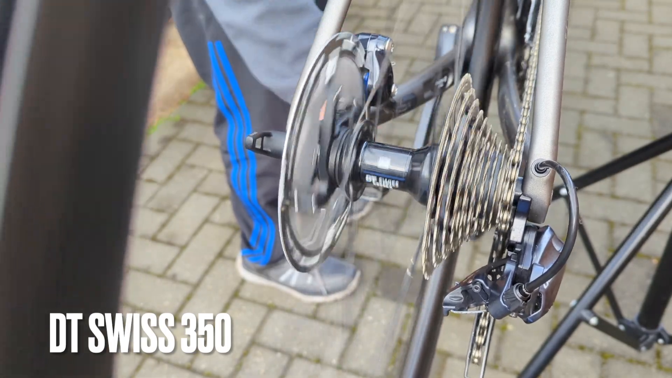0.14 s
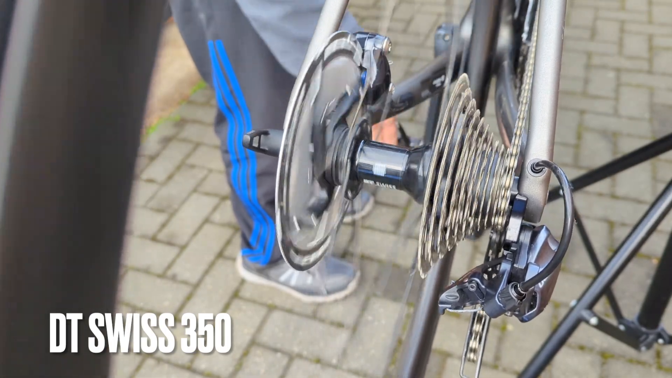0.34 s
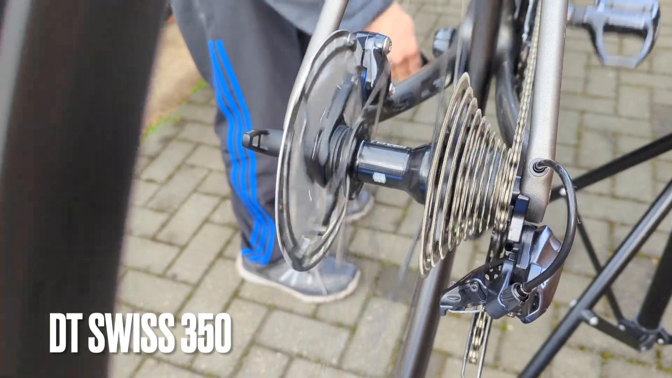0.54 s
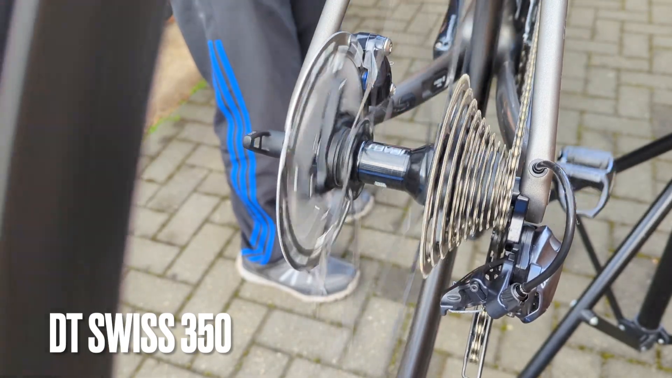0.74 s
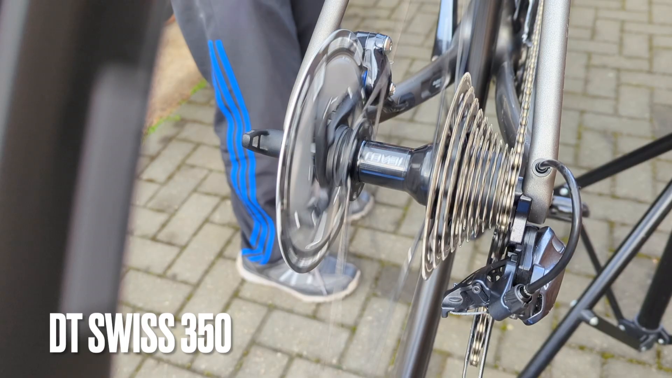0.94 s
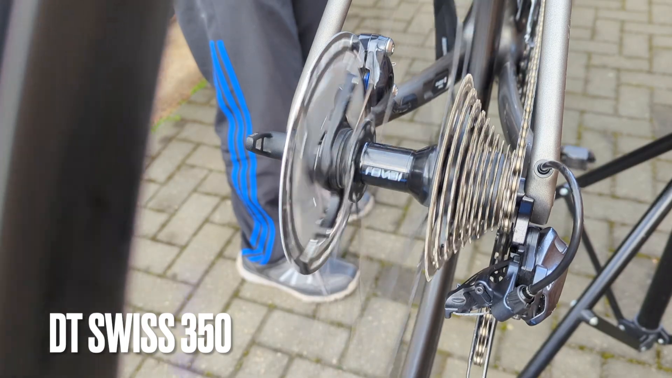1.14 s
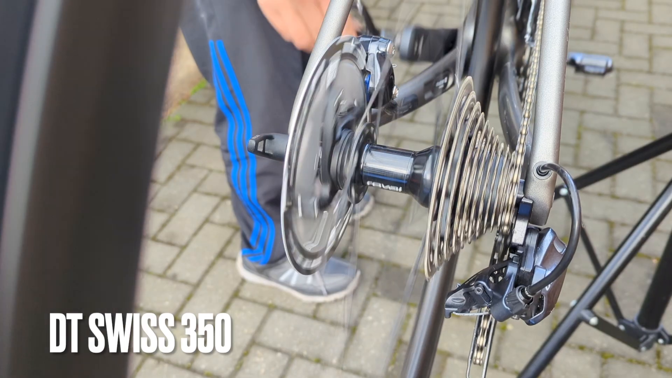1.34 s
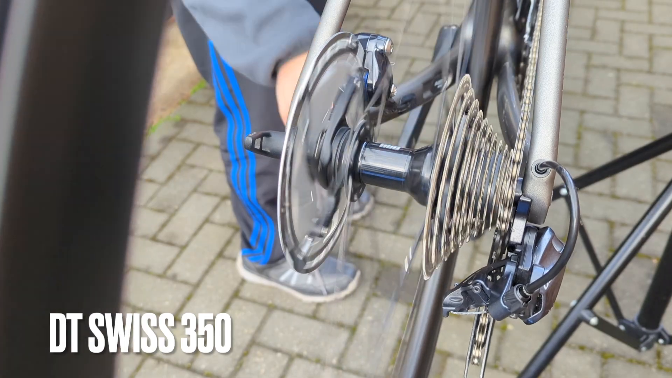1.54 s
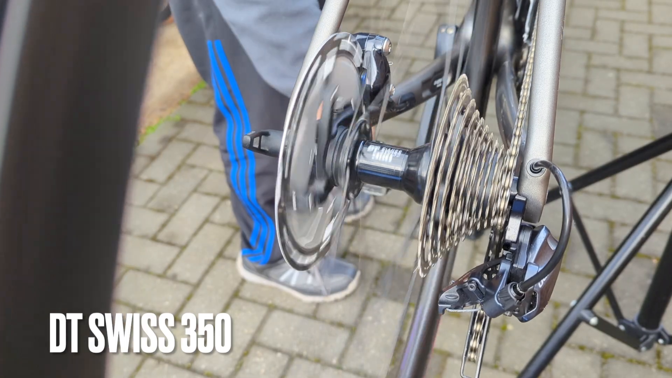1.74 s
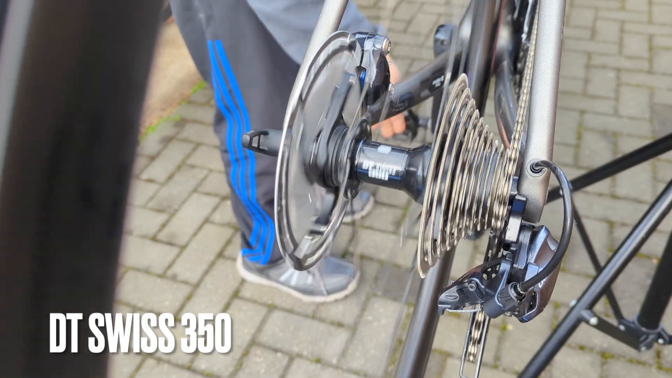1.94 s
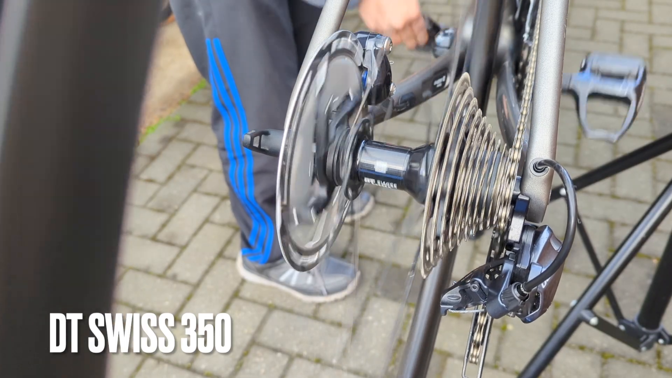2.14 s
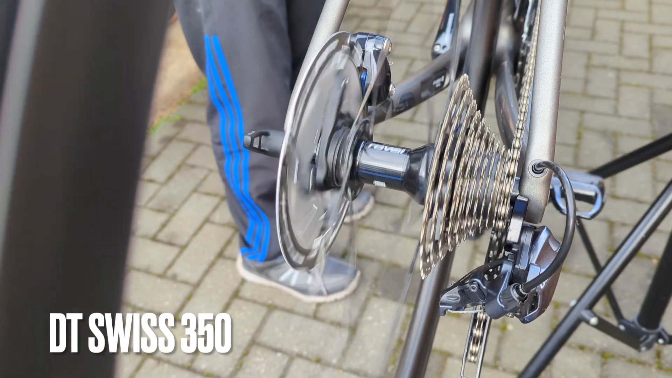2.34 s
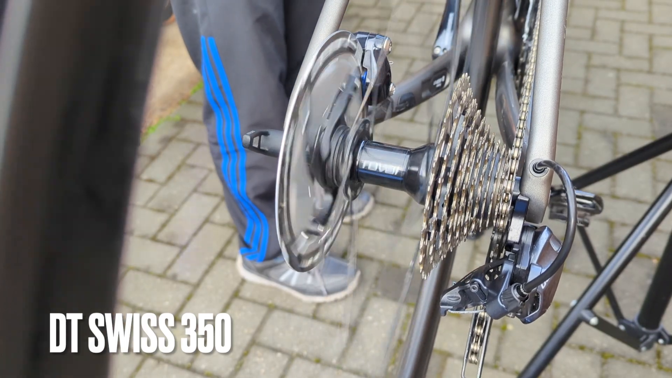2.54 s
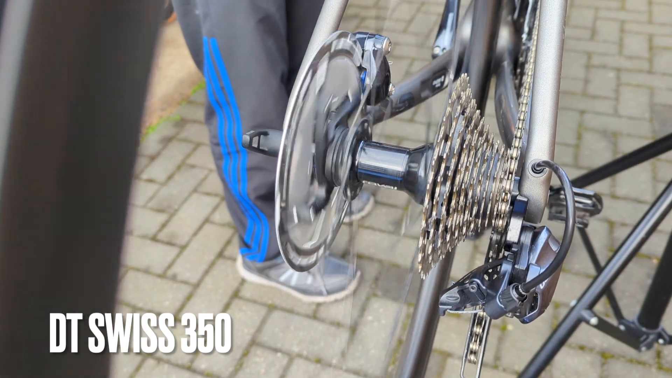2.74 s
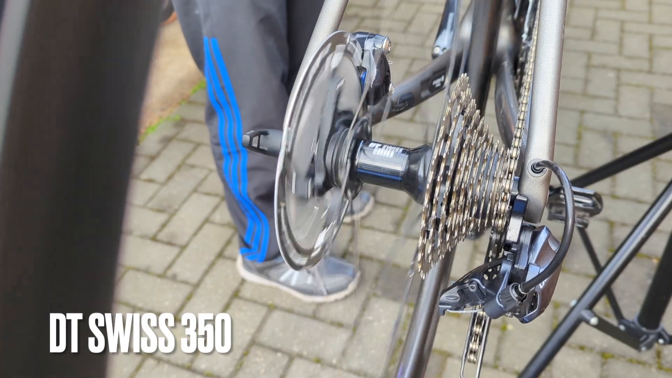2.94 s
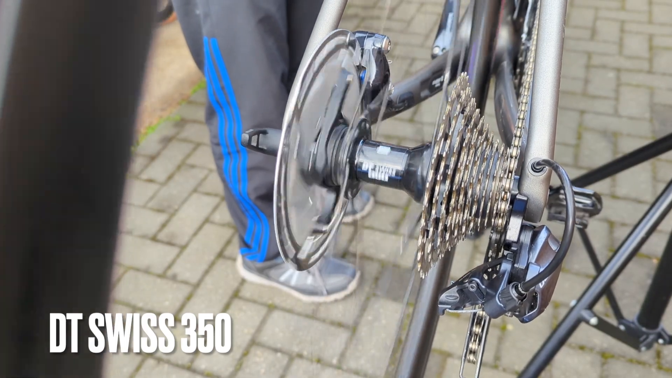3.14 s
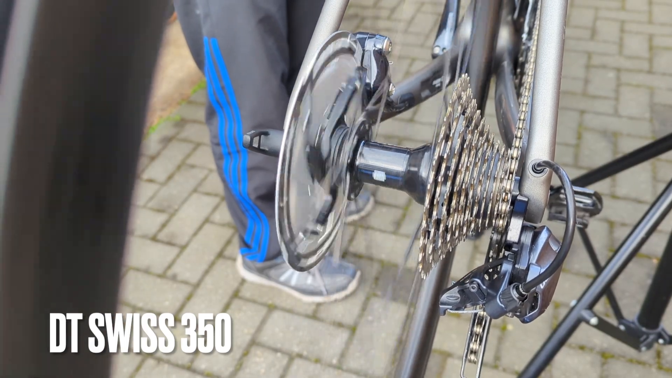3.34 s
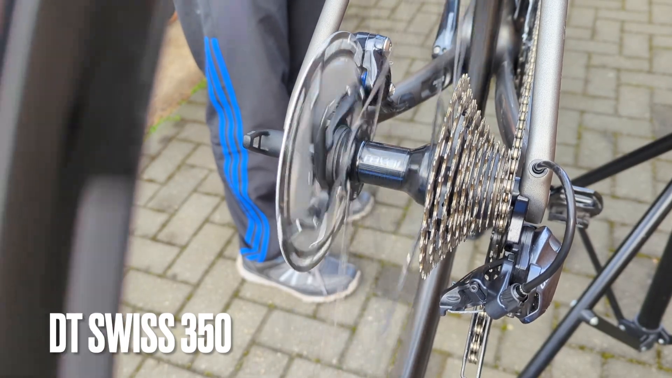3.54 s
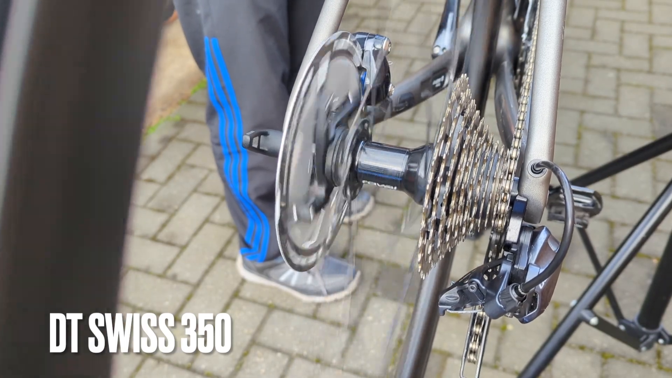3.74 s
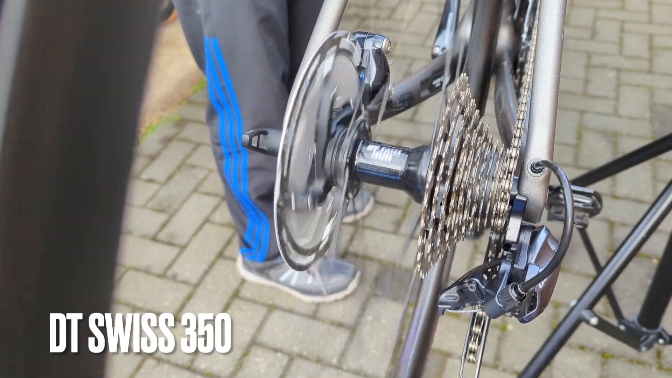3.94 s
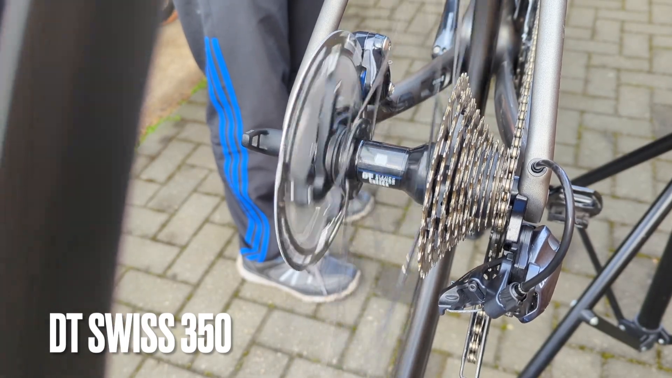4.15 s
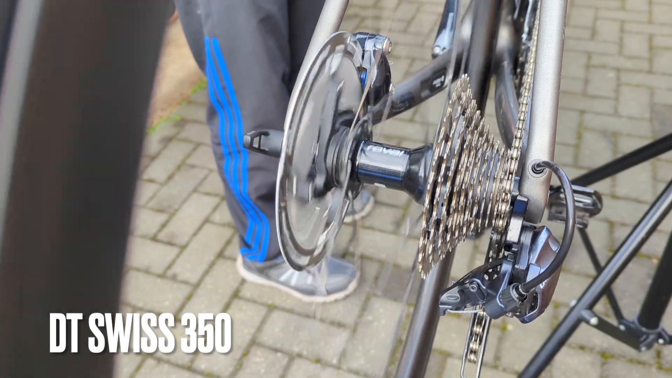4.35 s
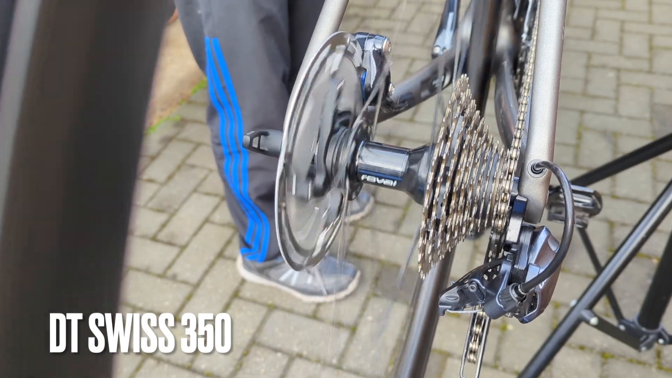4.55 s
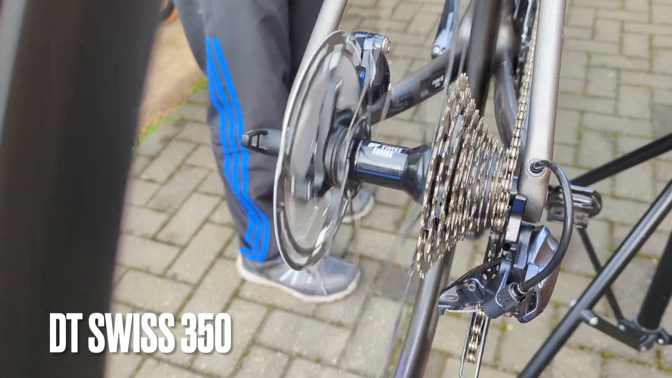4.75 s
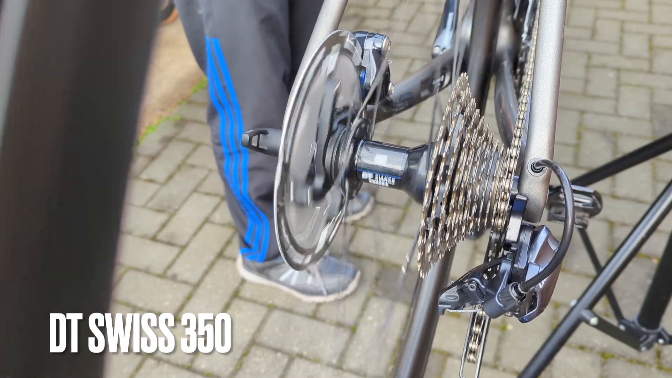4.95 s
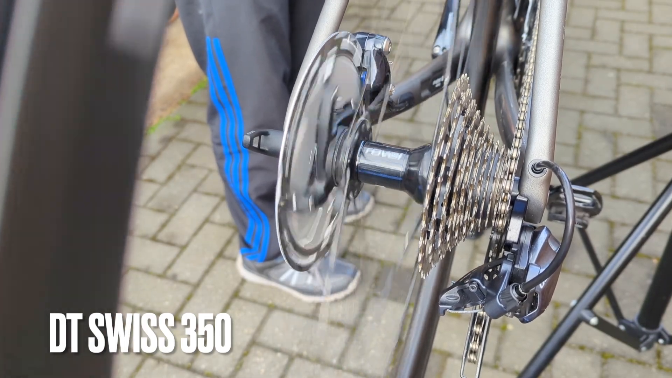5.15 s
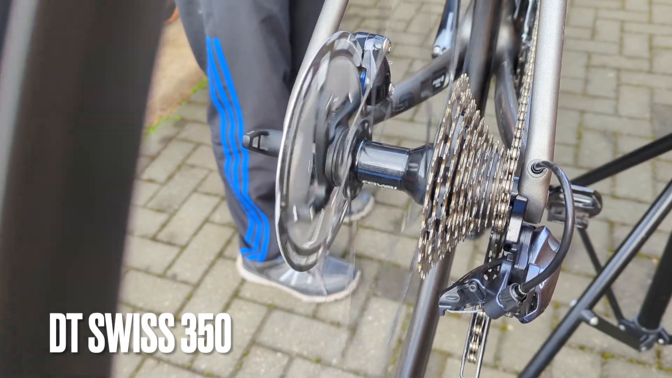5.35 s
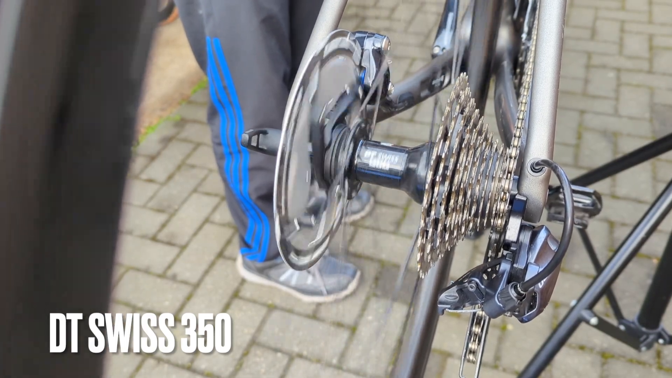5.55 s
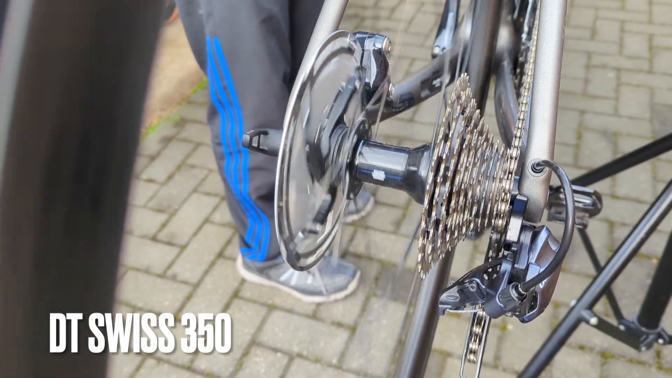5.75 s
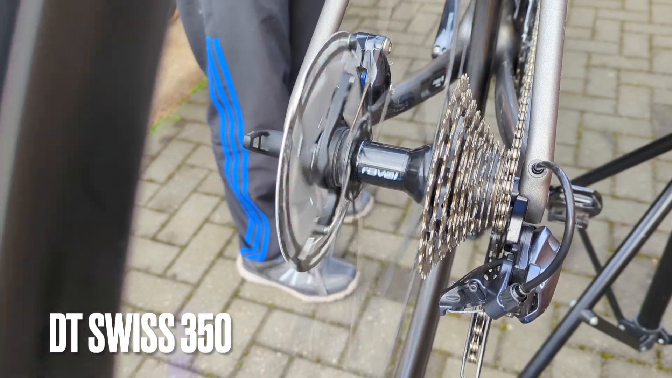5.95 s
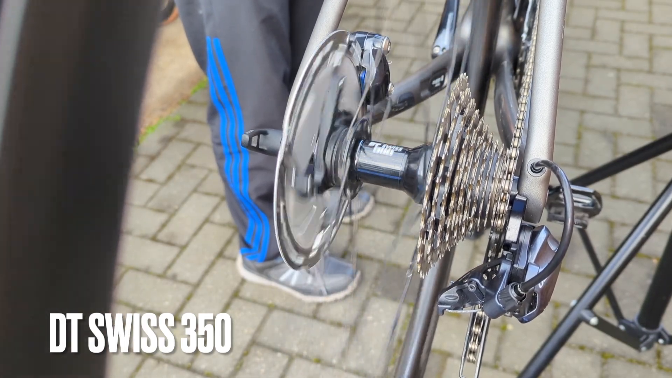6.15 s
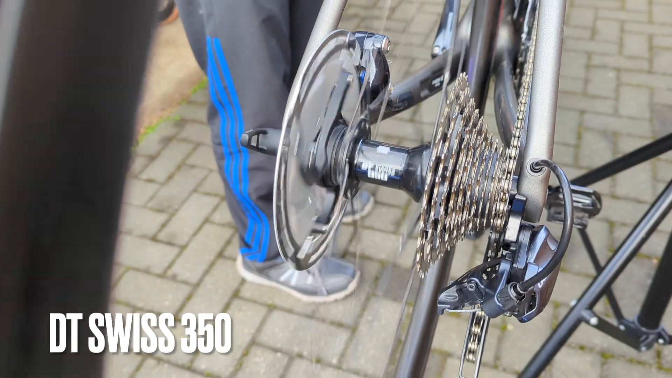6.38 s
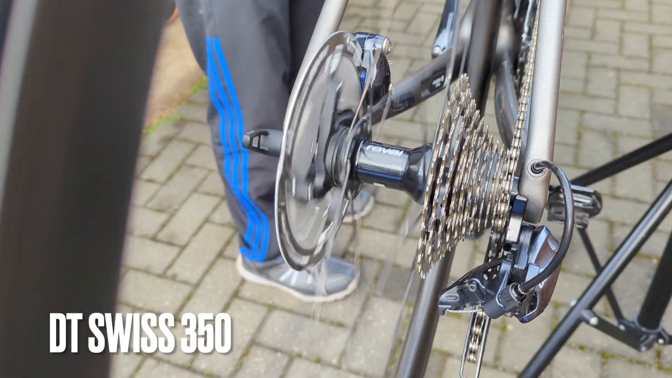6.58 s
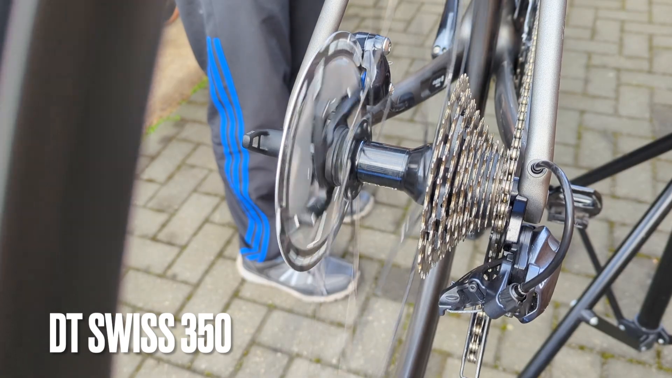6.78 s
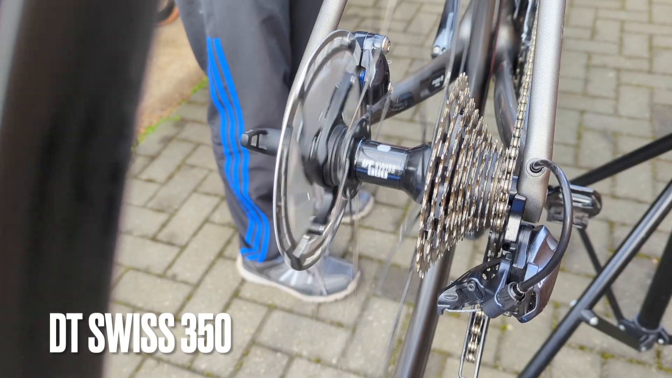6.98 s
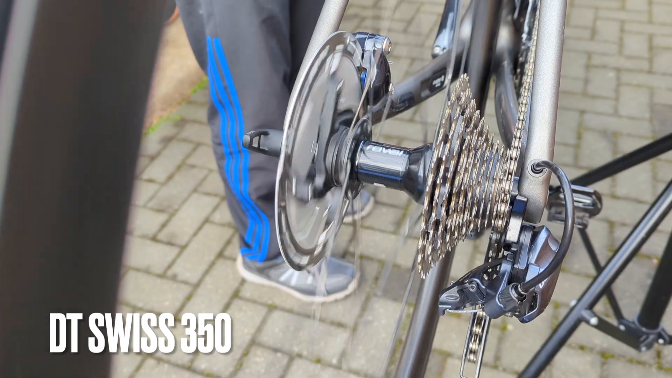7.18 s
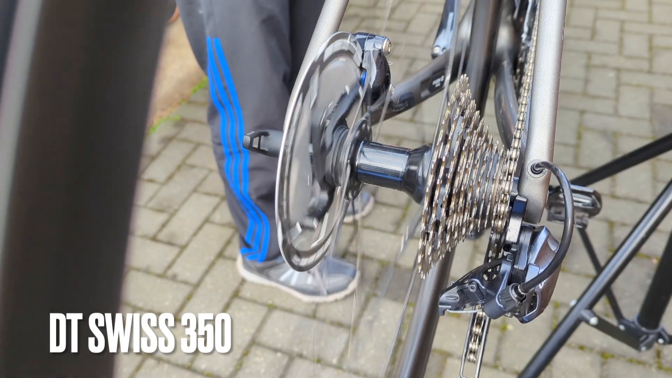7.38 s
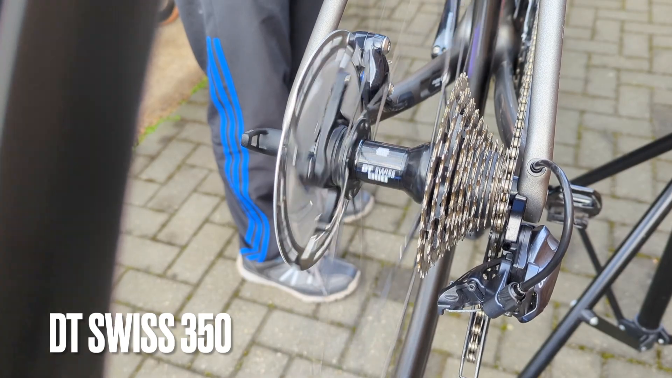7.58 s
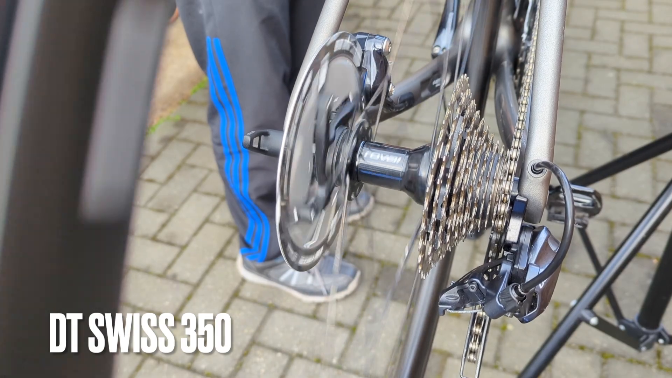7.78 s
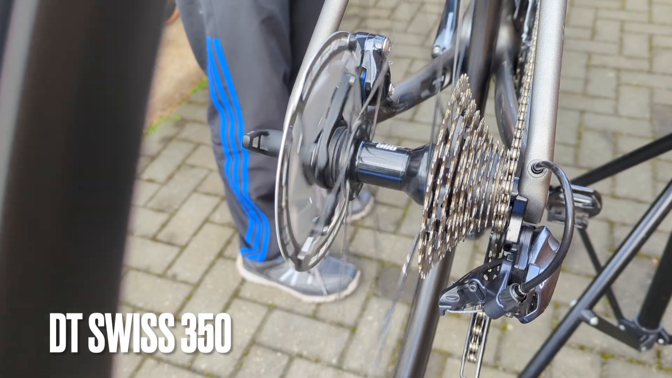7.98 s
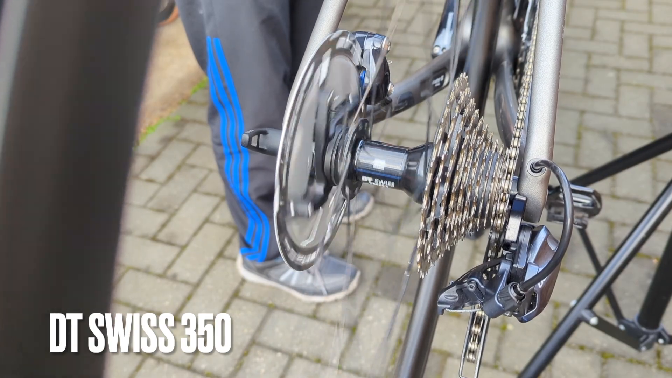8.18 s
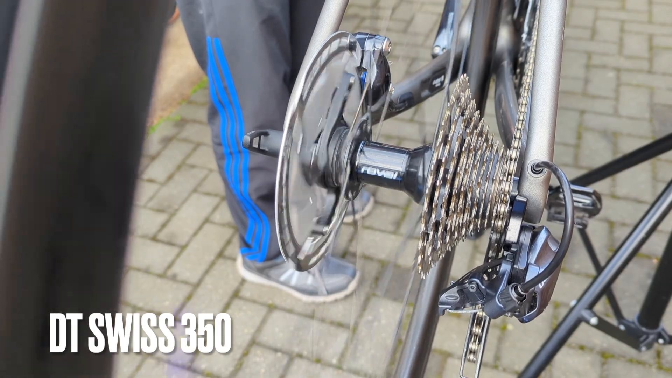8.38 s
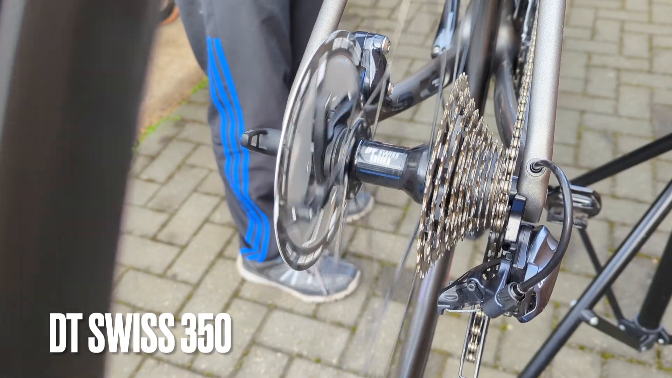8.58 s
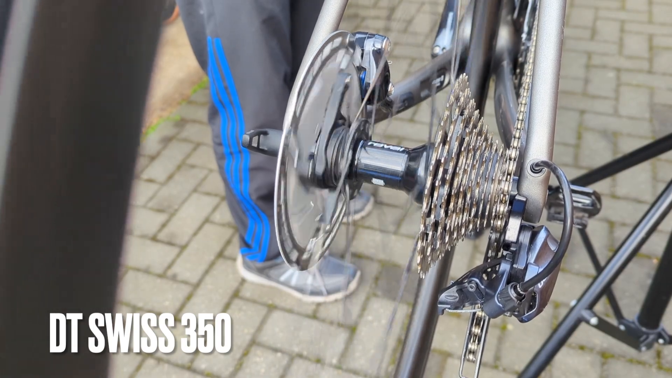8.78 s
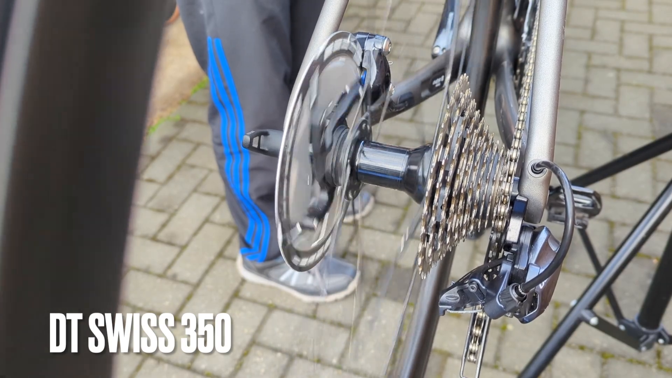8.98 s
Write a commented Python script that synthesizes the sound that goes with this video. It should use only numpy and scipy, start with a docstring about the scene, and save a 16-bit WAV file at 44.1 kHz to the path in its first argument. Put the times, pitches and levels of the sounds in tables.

```python
"""Freewheeling bicycle wheel

A bicycle rear wheel spins on a stand outdoors, close to two microphones. Pawls (small sprung catches) snap over
a ring of 60 teeth: fast and wavering while the cranks turn backwards, then slowly falling as the wheel coasts.
Clicks timed by the teeth are shaped into blow, clatter and snap, and ring the metal; uneven teeth repeat every
turn. Shaped noise makes gusts, mostly on the left, and a distant street; fading tones make soft knocks nearby.
"""
import sys
import numpy as np
from scipy import signal
from scipy.fft import rfft, irfft, next_fast_len
from scipy.io import wavfile
from scipy.ndimage import uniform_filter1d

SR = 44100
rng = np.random.default_rng(int(sys.argv[2]) if len(sys.argv) > 2 else 0)


def digitize_waveform(pressure):
    """Quantize a signal to 16-bit integers and store it at the path in sys.argv[1].

    Rows of a 2-D input are taken as channels; values are limited to [-1, 1].
    """
    field = np.atleast_2d(pressure).T
    bounded = np.clip(field, -1, 1)
    quanta = np.round(bounded * 32767).astype(np.int16)
    wavfile.write(sys.argv[1], SR, quanta)


def magnitude_from_level(level_db):
    """Linear magnitude for a level in decibels (20 dB per decade)."""
    exponent = np.asarray(level_db, float) / 20
    return 10 ** exponent


N = 397782  # length in samples

TEETH = 60
# Speed past the pawls, as back-pedalling adds to wheel speed: t/s, speed/(teeth per s)
PEDALLING = [(0.0, 448.0), (0.08, 431.0), (0.2, 420.0), (0.36, 441.0), (0.56, 482.0), (0.67, 480.3),
             (1.1, 431.2), (1.29, 442.3), (1.36, 474.9), (1.55, 427.4), (1.68, 404.0), (1.79, 417.0),
             (1.96, 450.2), (2.04, 454.2), (2.12, 438.9), (2.23, 441.2), (2.29, 411.4), (2.46, 262.0)]
# The free wheel slows by drag in proportion to its speed; DRAG_S is the time to fall to 37 %
COAST_S, COAST_TEETH_PER_S, DRAG_S = 2.5, 249.22, 19.984
UNBALANCE, FASTEST_TOOTH = 0.0085, 57  # speed swing once a turn (share), tooth where it peaks
# Unevenness round the ring, as waves: count/(waves per turn), depth/dB, first crest/tooth
BLOW_WAVES = [(1, 1.7, 4.7), (4, .5, 2.4), (6, .45, 2.4)]
CLATTER_WAVES = [(1, 1.1, 59.9), (2, 1.2, 6.5), (4, .7, .2), (5, .45, 1.6)]
SNAP_WAVES = [(1, 1.1, 58.1), (2, 1.3, 8.7), (3, .9, 13.2), (4, .7, .2), (5, 1.4, 11.2), (6, 1.2, 7.7),
              (10, .9, 4.8)]
SNAP_DB_PER_OCTAVE = 2.5  # the bright snap grows with each doubling of tooth speed
# The pawls land neatly, bounce above a certain speed, and rattle loosely as the cranks stop
SCATTER_S, BOUNCE_TEETH_PER_S, BOUNCE_S_PER_OCTAVE = 0.00001, 440.0, 0.00022
STOP_S, STOP_LENGTH_S, STOP_SCATTER_S = 2.38, 0.17, 0.00026
PATCH_S, PATCHY_DB = 0.06, 3.5  # neat and loose spells alternate
PLAY_TEETH, PLAY_S = 0.012, 0.012  # play in the ring lets the blows drift early and late
# Tone colour of the regular blow into hub and spokes: f/Hz, relative level/dB
BLOW_COLOUR = [(150, -74), (300, -39), (450, -25.5), (600, -15.5), (800, -23), (1100, -21.5), (1300, -10.5),
               (1500, -21), (1900, -11), (2300, -3.5), (3200, -3.5), (4300, -5.5), (5200, -12), (6500, 0),
               (8000, -35)]
# Tone colour of the scattered clatter: f/Hz, relative level/dB
CLATTER_COLOUR = [(3500, -40), (4700, -10.5), (5500, -6.5), (6200, -5.5), (8000, -6.5), (10500, -6),
                  (11500, -14.5), (13000, -60)]
# Tone colour of the bright snap: f/Hz, relative level/dB
SNAP_COLOUR = [(9000, -42.5), (11300, -7.5), (11900, 4.5), (12350, 7.5), (13000, 4.5), (13800, 4),
               (14600, -1.5), (15500, 3), (16200, -70), (17000, -95)]
BLOW_DB, CLATTER_DB, SNAP_DB = -29.5, -23.5, -17  # before force and left-right lean
SPOKE_PATHS = 12
LEAD_S = 0.0002  # the hub is nearer the left microphone
# Ringing of the turning metal parts: f/Hz, width/Hz, level/dB before beam, force and lean, lobes/(per turn),
# lobe depth/(0-1), loudest left/tooth, loudest right/tooth, left lead/rad
MODES = [(586, 34, -65.5, 1, 0.2, -6, 0, 1.17), (693.7, 27, -59, 1, .2, -1, 15, 1.07),
         (843, 68, -63, 2, 0.83, 17, -13, 0.5), (1285, 550, -52.5, 1, 0.15, -7, 29.5, 2.2),
         (1608, 80, -49.5, 2, 0.2, 9, -18, 0.29), (1908, 193, -40.5, 2, 0.18, 9.5, 12, 1.3),
         (2154, 168, -40.5, 2, 0.45, -4, 9.5, 0.97), (2500, 205, -38, 3, 0.16, 9, 1, 3.55),
         (2904.5, 116, -33.5, 2, 0.07, 14.5, 7, 0.84), (3138, 32, -44, 3, 0.9, -3.5, 16, 2.4),
         (3450, 90, -45.5, 3, 1, 50.5, -4.5, 4.9), (3858, 470, -35, 2, 0, -16, -26, 2),
         (4562, 150, -40.5, 3, 0.2, 2, 8, 4.4), (5022, 44, -33.5, 4, 0.02, -25, 0, 4.08),
         (5700, 61, -40, 4, 0.7, -16, 1, 7.8), (5860, 47, -34, 4, 1, 19.5, 1.5, 4.35),
         (5970, 13, -41.5, 2, 1, -1, 13, 7.6), (8620, 100, -37.5, 2, 0.54, 19, -37, 4.56)]
# Balance of the hub sound: f/Hz, left over right level/dB
LEAN = [(60, 4.0), (150, 4.0), (380, 1.0), (950, 0.5), (2380, 0.0), (5980, -2.0), (15000, 1.0)]
# How hard the pawls land, sagging as the cranks stop: t/s, level/dB
FORCE = [(0, 0.9), (2.25, 0.4), (2.37, 0.5), (2.43, -4.5), (2.52, -1), (2.62, -1.5), (2.72, -0.5),
         (9.02, 0.5)]
# Gusts: middle t/s, peak level/dB before colour and left-right balance, length/s between 37 % points
GUSTS = [(0.024, -38.5, .04), (1.863, -44, .06), (1.986, -41.5, 0.073), (2.13, -57, .05), (2.37, -59, .07),
         (2.75, -59, 0.088), (2.95, -63, 0.19), (3.443, -44, 0.053), (3.67, -48, 0.21), (3.915, -34, 0.074),
         (4.053, -56, 0.17), (4.215, -56, 0.056), (4.403, -58, 0.091), (4.82, -58, 0.15),
         (5.097, -68, 0.07), (5.487, -53, 0.06), (5.639, -47, 0.026), (5.787, -43, 0.049),
         (6.019, -35, 0.11), (6.11, -40, .07), (6.286, -44, .06), (6.342, -39.5, 0.035), (6.577, -52, 0.04),
         (6.907, -55, 0.039), (7.06, -42, 0.15), (7.24, -55, 0.36), (7.693, -54, 0.036),
         (7.803, -54, 0.048), (8.214, -56, .05), (8.31, -42, 0.066), (8.41, -42, 0.054),
         (8.86, -51.5, 0.12)]
BREEZE_DB = -69  # middle level, before left-right balance
LUMPS_DB, LUMP_S = 2.5, 0.04  # light lumpy air between the gusts
# Tone colour of the wind: f/Hz, relative level/dB
WIND_COLOUR = [(15, -55), (35, -30), (65, 2), (115, -2), (180, -7), (300, -7.5), (500, -15), (900, -50)]
# Tone colour of the distant street wash: f/Hz, relative level/dB
STREET_COLOUR = [(20, -40), (45, 6), (120, -15), (300, 2.5), (500, 8), (800, 4), (1200, -6), (3000, -45)]
STREET_DB = -59.5
# Soft knocks: t/s, level/dB of the tone as it starts to fade, f/Hz
KNOCKS = [(0.04, -36, 453), (0.858, -40, 520), (0.925, -39, 520), (1.266, -43, 464), (3.106, -38, 427),
          (3.197, -40, 490), (3.4, -36, 446), (3.492, -36, 440), (3.547, -49, 563)]


def evened(x):
    """Scales a sound to an average (rms) strength of 1."""
    return x / np.sqrt(np.mean(x ** 2) + 1e-20)


def curve(rows):
    """Joins the (time, value) rows with straight lines, one value per sample."""
    return np.interp(np.arange(N) / SR, *np.transpose(rows))


def colour(x, points, slope=1):
    """Shapes the spectrum by dB points joined on a log frequency axis; slope scales the dB."""
    size = next_fast_len(N)
    f, db = np.transpose(points)
    hz = np.fft.rfftfreq(size, 1 / SR)
    gain = magnitude_from_level(slope * np.interp(np.log(hz + 1), np.log(f), db))
    return irfft(rfft(x, size) * gain, size)[..., :N]


def resonate(x, hz, width):
    """Two equal resonances in a row, steep-sided, as a rotating (complex) signal."""
    pole = np.exp((2j * np.pi * hz - np.pi * width) / SR)
    return signal.lfilter([1], [1, -2 * pole, pole ** 2], x)


def pair(same, size=N):
    """Noise for two microphones; same is how alike they are (correlation)."""
    a, b = rng.standard_normal((2, size))
    same = np.clip(same, 0, 1)
    return np.array([a, same * a + np.sqrt(1 - same ** 2) * b])


def bell(middle_s, length_s):
    """A smooth rise and fall of height 1."""
    return np.exp(-(2 * (np.arange(N) / SR - middle_s) / length_s) ** 2)


def lumps(length_s):
    """Slow random ups and downs of rms 1, from noise averaged twice."""
    size = round(length_s * SR)
    smooth = uniform_filter1d(rng.standard_normal(N), size)
    return evened(uniform_filter1d(smooth, size))


def speeds():
    """Teeth per second: of the wheel alone, and past the pawls."""
    t = np.arange(N) / SR
    wheel = COAST_TEETH_PER_S * np.exp(-np.maximum(t - COAST_S, 0) / DRAG_S)
    pedalled = curve([*PEDALLING, (COAST_S, COAST_TEETH_PER_S)])
    return wheel, np.where(t < COAST_S, pedalled, wheel)


def teeth_passed(speed):
    """Teeth counted from the moment the cranks stand still; the wheel's heavy side hurries and drags it."""
    tooth = np.cumsum(speed) / SR
    tooth -= tooth[round(COAST_S * SR)]
    swing = np.sin(2 * np.pi * (tooth - FASTEST_TOOTH) / TEETH)
    return tooth + UNBALANCE * TEETH / (2 * np.pi) * swing


def waves(table, tooth):
    """dB by which the ring is uneven at each tooth, as a sum of waves."""
    return sum(db * np.cos(2 * np.pi * count * (tooth - crest) / TEETH) for count, db, crest in table)


def strikes(tooth, late_s, scatter_s, scatter_db):
    """One click as each tooth passes, a little off in time and strength, placed between samples."""
    at = np.interp(np.arange(np.ceil(tooth[0]), tooth[-1]), tooth, np.arange(N))
    off = rng.standard_normal((len(at), 2))
    scatter_s = (scatter_s * np.ones(N))[at.astype(int)]
    at = np.clip(at + SR * (late_s + scatter_s * off[:, 0]), 8, N - 10)
    near = np.floor(at).astype(int)[:, None] + np.arange(-7, 9)
    gap = near - at[:, None]
    shape = np.sinc(gap) * np.cos(np.pi * gap / 16) ** 2
    clicks = shape * magnitude_from_level(scatter_db * off[:, 1:])
    return np.bincount(near.ravel(), clicks.ravel(), N)


def regular_blow(tooth, speed):
    """Nearly regular clicks give the buzz its pitch; bounce and loose play blur their timing."""
    neat_s = SCATTER_S * magnitude_from_level(PATCHY_DB * lumps(PATCH_S))
    bounce_s = BOUNCE_S_PER_OCTAVE * np.maximum(np.log2(speed / BOUNCE_TEETH_PER_S), 0)
    scatter_s = neat_s + bounce_s + STOP_SCATTER_S * bell(STOP_S, STOP_LENGTH_S)
    clicks = strikes(tooth + PLAY_TEETH * lumps(PLAY_S), 0, scatter_s, 0.25)
    return evened(clicks) * magnitude_from_level(waves(BLOW_WAVES, tooth))


def bursts(tooth, decay_s, between):
    """Envelope of three pawls landing out of step and dying fast, over a steady rattle."""
    landings = sum(abs(strikes(tooth, late_s, 0.00018, 2.2)) for late_s in (0, 0.0006, 0.0012))
    fade = np.exp(-np.arange(800) / SR / decay_s)
    return evened(signal.oaconvolve(landings, fade)[:N]) + between


def pawl_clatter(tooth):
    """Scattered pawl landings give a hiss: noise in short bursts, uneven round the ring."""
    hiss = bursts(tooth, 0.0037, 0.75) * pair(0.1) * magnitude_from_level(waves(CLATTER_WAVES, tooth))
    return evened(colour(hiss, CLATTER_COLOUR))


def pawl_snap(tooth, speed):
    """Shorter bursts of very high noise, stronger when the teeth pass faster."""
    snap_db = waves(SNAP_WAVES, tooth) + SNAP_DB_PER_OCTAVE * np.log2(speed / COAST_TEETH_PER_S)
    snap = bursts(tooth, 0.001, 1.1) * pair(0.3) * magnitude_from_level(snap_db)
    return evened(colour(snap, SNAP_COLOUR))


def spokes(blow, wheel):
    """Spokes smear the blow in time without colouring it; paths hand over as the wheel turns."""
    out = np.zeros((2, N))
    for k in range(SPOKE_PATHS):
        away = (wheel / TEETH * SPOKE_PATHS - k + 1) % SPOKE_PATHS - 1
        fade = np.cos(np.pi / 2 * np.clip(away, -1, 1))
        path = pair(0.091, size=2048) * magnitude_from_level(-60 * np.arange(2048) / SR / 0.025)
        path[:, 0] += 3.0  # the direct way
        flat = irfft(np.exp(1j * np.angle(rfft(path))))  # all frequencies equally strong
        smear = np.roll(flat, 256, axis=1)
        out += signal.oaconvolve((blow * fade)[None], smear, axes=1)[:, 256:N + 256]
    return out


def flutter(wheel, depth):
    """Passing spokes shade a tone in strength and phase, alike every turn, unlike left and right."""
    sideband = np.arange(-11, 12)  # ripples per turn
    weights = rng.standard_normal((2, len(sideband), 2)) @ [1, 1j] / np.sqrt(2 * len(sideband))
    ripples = np.exp(2j * np.pi * np.outer(sideband, np.arange(600)) / 600)
    one_turn = 1 + depth * weights @ ripples
    return one_turn[:, (wheel / TEETH % 1 * 600).astype(int)]


def ringing(blow, clatter, wheel):
    """Struck metal parts ring; each tone beams in lobes that sweep past the microphones."""
    out = np.zeros((2, N))
    for hz, width, db, lobes, depth, left, right, lead in MODES:
        rough = np.clip(hz / 7000, 0, 1) ** 6  # scattered landings drive the high modes
        ring = resonate((1 - rough) * blow + rough * 1.5 * clatter[0], hz, width)
        from_loudest = wheel - np.array([[left], [right]])
        beam = 1 + depth * np.cos(2 * np.pi * round(lobes) * from_loudest / TEETH)
        shade = flutter(wheel, 1.05 * min(hz / 1500, 1) * (1 - 0.86 * rough))
        shaded = shade * [ring, ring * np.exp(-1j * lead)]
        out += magnitude_from_level(db) * beam * evened(shaded.imag)
    return out


def hub():
    """Blow, clatter and snap of the pawls, with the ringing they set off in the turning parts."""
    rolling, speed = speeds()
    wheel, tooth = teeth_passed(rolling), teeth_passed(speed)  # the wheel's own angle; the ring's past the pawls
    blow = regular_blow(tooth, speed)
    clatter = pawl_clatter(tooth)
    out = magnitude_from_level(BLOW_DB) * evened(colour(spokes(blow, wheel), BLOW_COLOUR))
    out += magnitude_from_level(CLATTER_DB) * clatter + magnitude_from_level(SNAP_DB) * pawl_snap(tooth, speed)
    out[1] = np.roll(out[1], round(LEAD_S * SR))
    out += ringing(blow, clatter, wheel)
    leaning = colour(out[0], LEAN, slope=0.5), colour(out[1], LEAN, slope=-0.5)
    return magnitude_from_level(curve(FORCE)) * np.array(leaning)


def gusts():
    """Strength of the air: separate gusts over a lumpy breeze."""
    breeze = magnitude_from_level(BREEZE_DB + LUMPS_DB * lumps(LUMP_S))
    return breeze + sum(magnitude_from_level(db) * bell(s, length) for s, db, length in GUSTS)


def wind():
    """Low pressure pops of several sizes over soft noise, separate on each side and louder on the left."""
    puffs = 0.5 * rng.standard_normal((2, N))
    for hz in (124.0, 159.0, 242.0, 350.0):
        pops = (rng.random((2, N)) < 70.0 / SR) * rng.standard_normal((2, N))  # about 70 a second
        puffs += evened(resonate(pops, hz, 1.26 * hz).imag)
    balance = magnitude_from_level(np.array([[3.0], [-4.0]]))  # left, right dB
    return gusts() * evened(colour(puffs, WIND_COLOUR)) * balance


def street():
    """A distant steady wash: coloured noise, half alike on the two sides."""
    return magnitude_from_level(STREET_DB) * evened(colour(pair(0.5), STREET_COLOUR))


def knocks():
    """Dull hollow thuds: a fast-fading tone with a short noisy tail round the same pitch."""
    t, out = np.arange(5000) / SR, np.zeros(N + 5000)
    for (s, db, hz), noise in zip(KNOCKS, rng.standard_normal((len(KNOCKS), 5000))):
        tone = np.sin(2 * np.pi * hz * t) * magnitude_from_level(-60 * t / 0.061)  # falls 60 dB in 0.061 s
        tail = 0.48 * evened(resonate(noise, hz, 330).imag) * magnitude_from_level(-60 * t / 0.34)
        onset = np.minimum(t / 0.00087, 1)
        out[round(s * SR):][:5000] += magnitude_from_level(db) * (tone + tail) * onset
    return out[:N]


def scene():
    """Hub, wind, the wash of the street, and knocks equally on both sides."""
    return hub() + wind() + street() + knocks()


def top_cut(x):
    """Nothing passes above the cut-off."""
    return signal.sosfilt(signal.butter(12, 16510, fs=SR, output="sos"), x)


def record(dry):
    """Peaks beyond full scale are cut flat to finish the mix."""
    mix = np.clip(dry, -1, 1)
    return top_cut(mix)


dry = scene()
out = record(dry)
digitize_waveform(out)
```